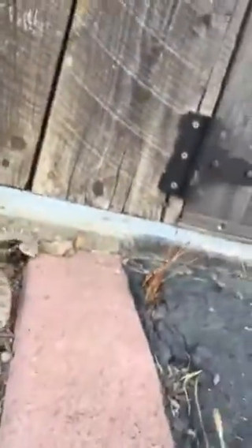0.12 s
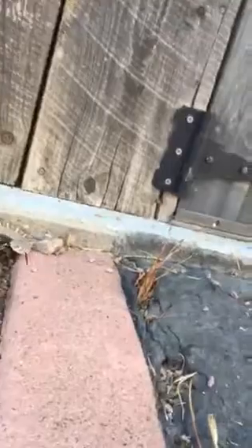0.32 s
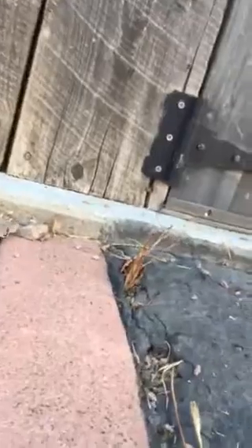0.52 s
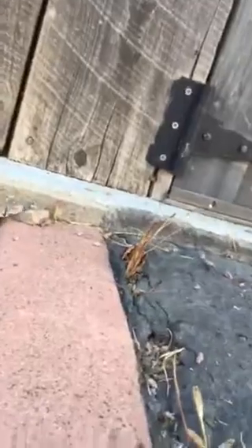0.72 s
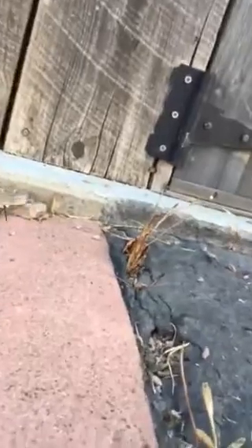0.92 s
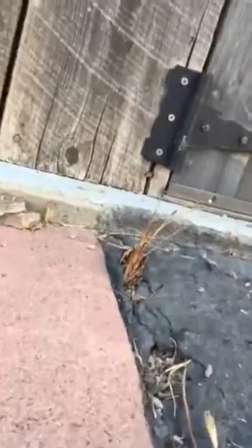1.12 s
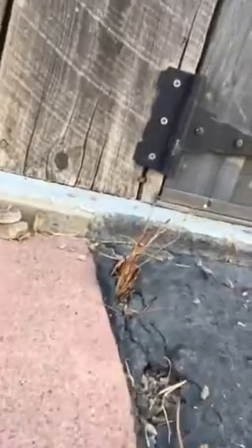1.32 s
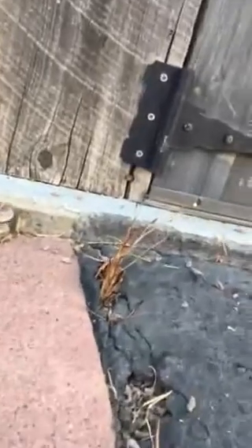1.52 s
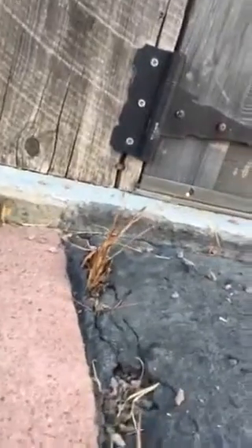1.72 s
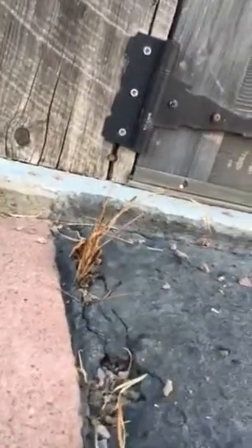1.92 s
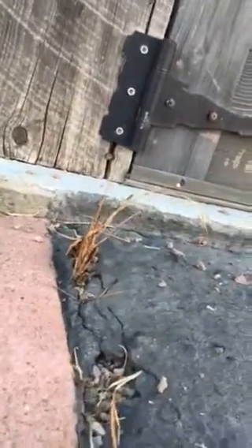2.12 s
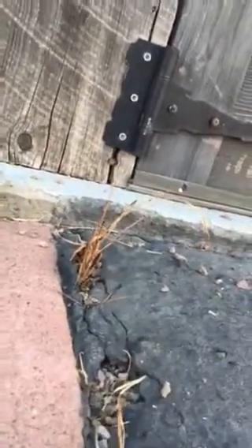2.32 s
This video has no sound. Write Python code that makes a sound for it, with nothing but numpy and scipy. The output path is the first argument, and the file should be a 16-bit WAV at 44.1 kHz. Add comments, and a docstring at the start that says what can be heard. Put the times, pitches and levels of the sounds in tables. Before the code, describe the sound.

A rattlesnake's steady, dry, high buzz outdoors, with low thumps and wind bumping the handheld microphone.

```python
"""From the start a rattlesnake buzzes beside a wooden gate: a hundred or so shakes a second, soon slowing a little,
each a quick run of noise bursts for the horny segments colliding; boards and pavement answer with decaying noise.
Scuffs (enveloped noise) come in the first half second; thumps (bursts of low noise) crowd from then to 1.2 s, with
gusts of wind (low noise) and knocks (single swings of a sine) that go on more sparsely. The colour of the buzz
shifts as the hand-held microphone moves over the pavement, and the faint hiss of the air swells near the end."""
import sys
import numpy as np
from scipy import signal
from scipy.fft import rfft, irfft, next_fast_len
from scipy.io import wavfile
from scipy.ndimage import uniform_filter1d

SR = 44100
rng = np.random.default_rng(int(sys.argv[2]) if len(sys.argv) > 2 else 0)


def dump(signal):
    """Clip the signal to [-1, 1] and save it as 16-bit WAV at the path in sys.argv[1]."""
    limited = np.clip(np.atleast_2d(signal).T, -1, 1)
    pcm = np.round(limited * 32767).astype(np.int16)
    wavfile.write(sys.argv[1], SR, pcm)


N = 103635  # length in samples

# Spectrum of the outdoor air. Each row: frequency in Hz, relative level in dB.
AIR_SPECTRUM = [(100, 4.5), (400, -3.5), (900, -3), (1600, -5.5), (2400, -8), (5000, -6.5), (15000, -10)]
# Level of the air. Each row: time in seconds, rms level in dB.
AIR_LEVEL = [(0, -63), (1.1, -63.5), (1.6, -57), (2.1, -55.5), (2.35, -60.5)]

# Strength of the wind on the microphone. Each row: time in seconds, level in dB.
WIND_LEVEL = [(0.0, -49), (0.42, -45), (0.46, -43.5), (0.52, -41.5), (0.65, -32), (0.69, -38),
              (0.77, -24.5), (0.79, -41), (0.84, -40), (0.93, -24.5), (0.97, -40.5), (1.07, -26.5),
              (1.12, -39), (1.15, -32), (1.26, -49), (1.47, -33.5), (1.54, -50), (1.58, -43), (1.65, -33.5),
              (1.69, -62), (1.82, -39.5), (1.84, -57), (1.92, -33.5), (2.0, -60.5), (2.08, -49.5),
              (2.35, -57.5)]
# Spectrum of the wind. Each row: frequency in Hz, relative level in dB.
WIND_SPECTRUM = [(15, -44), (30, -15), (50, -1.5), (70, 1.5), (100, -1.5), (150, -13.5), (250, -26.5),
                 (500, -46), (1000, -60)]
WIND_EVENNESS = 0.4  # 0 = freely fluctuating, 1 = own swells divided out

# Thumps of air and hand on the microphone. Each row: start in seconds, length in seconds,
# level in dB (rms if spread over that length), upper band edge in Hz.
THUMPS = [(.088, .025, -43.5, 173), (.198, 0.037, -45, 132), (0.454, 0.026, -38, 96),
          (.49, 0.021, -44, 160), (.565, 0.016, -30.5, 360), (.628, 0.032, -31, 284),
          (.657, 0.045, -28.5, 486), (.688, 0.016, -57, 375), (.725, 0.037, -31.5, 380),
          (.755, 0.031, -29, 234), (.794, 0.018, -33.5, 385), (.832, 0.025, -41, 355),
          (.866, 0.018, -32, 212), (.903, 0.019, -27, 430), (.918, 0.014, -28, 172),
          (.934, 0.015, -27, 466), (1.04, 0.052, -38, 276), (1.078, 0.03, -33, 430),
          (1.141, 0.021, -31, 437), (1.168, 0.027, -35.5, 210), (1.235, 0.088, -46, 222),
          (1.357, 0.015, -38.5, 195), (1.395, 0.066, -40, 268), (1.578, 0.024, -34, 164),
          (1.61, 0.019, -41.5, 206), (1.763, 0.016, -50.5, 393), (1.793, 0.018, -39, 145),
          (1.885, 0.037, -41.5, 235), (1.932, 0.0097, -39.5, 296)]
THUMP_LOW_HZ = 85.6
THUMP_SLOPE, THUMP_TILT = 4.1, 0.92  # exponents of the fall above the upper edge and of the gentler overall fall
THUMP_RISE_S, THUMP_RELEASE_S = 0.0023, 0.006

# Light scuffs of the hand. Each row: start in seconds, level in dB before the envelope.
SCUFFS = [(.051, -46), (0.235, -66), (.392, -58)]
# Spectrum of a scuff. Each row: frequency in Hz, relative level in dB.
SCUFF_SPECTRUM = [(200, -18), (500, 2.5), (750, -4), (1050, 0), (1500, -3), (2200, -19), (5000, -53)]
SCUFF_RISE_S, SCUFF_T60_S = 0.00072, 0.063

# Knocks of the fingers on the casing. Each row: centre in seconds, level in dB before the envelope, pitch in Hz.
KNOCKS = [(0.5646, -25.5, 525), (0.7139, -22.5, 526), (0.7174, -17, 194), (.9113, -23, 460),
          (0.948, -27, 352), (1.1564, -26.5, 320), (1.743, -29.5, 157), (1.925, -26, 148)]
KNOCK_WIDTH_CYCLES = 0.4  # standard deviation of the bell-shaped envelope

GATE_DB, GATE_T60_S = -14.5, 0.088  # answer of the boards and the pavement

# Speed of the tail. Each row: time in seconds, shakes per second.
SHAKE_RATE = [(0, 106.38), (.4, 104.64), (.8, 103.98), (1.15, 101.91), (1.5, 102.21), (1.85, 101.57),
              (2.35, 102.03)]
FIRST_SHAKE = 0.235  # wait before the first shake, in shakes
# Strength of the buzz. Each row: time in seconds, level in dB.
BUZZ_LEVEL = [(0, -43), (.2, -43), (.6, -43.5), (.85, -44.3), (1.3, -43), (1.7, -41.5), (2.0, -41),
              (2.15, -41.5), (2.35, -41.5)]
# Segments colliding in turn in every shake. Each row: delay as a share of a shake, relative level in dB,
# timing scatter in milliseconds.
COLLISIONS = [(0, -1.5, .25), (.16, -2.5, .4), (.24, -1.5, .35), (0.431, -1.5, .6), (0.561, -10, .6),
              (.72, -16.5, 1.0)]
CLACK_RISE_S, CLACK_T60_S, CLACK_SCATTER_DB = 0.00035, 0.0054, 3.0
SHAKE_SCATTER_DB, BACKSTROKE_DB = 1.0, -1.3  # random spread; every second swing is weaker
SEGMENT_DEPTH_DB, SEGMENT_WIDTH_HZ = 3, 972  # depth and spacing of each clack's random resonances

# Spectra of the buzz at four microphone positions. Each row: frequency in Hz, relative level in dB.
SPECTRUM_FAR = [(1160, -23), (1510, -19.5), (2020, -20.0), (2450, -31), (2800, -33), (3060, -16),
                (4520, -19.5), (5210, -9), (6070, -16), (6420, -9), (7620, -9.5), (8310, -2.5),
                (10980, -7.5), (11240, -8), (12190, -8), (12790, -9.5), (13480, -6.5), (14430, 0),
                (14770, -3.5), (15720, -9)]
SPECTRUM_PASSING = [(1160, -20.5), (1680, -16.5), (2020, -16.5), (2540, -33), (3060, -13.5), (4440, -25),
                    (5210, -10.5), (5990, -14.5), (6330, -8.5), (7190, -5.5), (7450, -8), (8310, -1.5),
                    (9600, 2), (10030, -9), (11070, -9), (13140, -9.5), (13910, -1.5), (14340, -1),
                    (14860, 0.5), (15720, -16)]
SPECTRUM_NEAR = [(1160, -27), (1590, -10.5), (2020, -16.5), (2280, -25.5), (3140, -11), (4780, -19.0),
                 (5210, -10.5), (5470, -17), (6070, -19), (7190, -7.5), (7800, -9), (8050, -3),
                 (8910, -4.5), (9170, -2.0), (9600, -0.5), (10290, -4.5), (11070, -5.0), (11670, -8.5),
                 (14080, 1), (15720, -6.5)]
SPECTRUM_TURNED = [(1160, -26), (1590, -14), (1850, -31), (2200, -28), (2710, -12.5), (3830, -14.5),
                   (4090, -9.5), (4870, -16), (5300, -3.5), (6160, -10.5), (6500, -16), (8480, 1),
                   (9260, -6.5), (9950, -7.0), (10380, -13), (11330, -9), (11580, -16.5), (12960, -10),
                   (13910, 0.5), (15720, -4)]
# Times at which those positions are reached, in order. Each entry: time in seconds.
POSITION_TIMES = [.45, 1.15, 1.98, 2.16]
RATTLE_LOW_HZ = 1180

TOP_HZ = 15810  # band limit of the recorder


def amp(db):
    """Level law: decibels to amplitude gain."""
    return 10 ** (np.asarray(db) / 20)


def unit(x):
    """Normalisation of power: scale to rms 1."""
    return x / np.sqrt(np.mean(x ** 2) + 1e-20)


def along(points, hz):
    """Logarithmic pitch: interpolate (Hz, value) points on a log frequency axis."""
    f, v = np.transpose(points)
    return np.interp(np.log(hz + 1), np.log(f + 1), v)


def curve(rows):
    """Linear interpolation: (seconds, value) points become one value per sample."""
    return np.interp(np.arange(N) / SR, *np.transpose(rows))


def decay(t, t60_s):
    """Exponential decay: a fall of 60 dB in t60_s seconds."""
    return np.exp(-np.log(1000) * t / t60_s)


def filtered(x, response):
    """Linear filtering: multiply the spectrum by a response of frequency."""
    m = next_fast_len(len(x) + 8192)
    spectrum = rfft(x, m) * response(np.fft.rfftfreq(m, 1 / SR))
    return irfft(spectrum, m)[:len(x)]


def noise(colour):
    """Spectral shaping: white noise filtered to a colour, at rms 1."""
    return unit(filtered(rng.standard_normal(N), lambda hz: amp(along(colour, hz))))


def add(track, s, sound):
    """Superposition: mix a sound into the track at time s."""
    i = int(np.clip(round(s * SR), 0, N))
    track[i:i + len(sound)] += sound[:N - i]


def air():
    """Broadband noise: the outdoor air hisses with a slowly varying level."""
    return amp(curve(AIR_LEVEL)) * noise(AIR_SPECTRUM)


def wind():
    """Turbulence: slow eddies press on the microphone as low noise, its own swells partly evened out."""
    eddies = noise(WIND_SPECTRUM)
    power = np.abs(signal.hilbert(eddies)) ** 2
    swell = np.sqrt(np.abs(uniform_filter1d(power, size=900)) + 1e-6)
    return amp(curve(WIND_LEVEL)) * unit(eddies / swell ** WIND_EVENNESS)


def thumps(size=8192):
    """Pressure bursts: short lumps of low noise, each with its own upper band edge."""
    out, t = np.zeros(N), np.arange(size) / SR
    for s, length, db, edge_hz in THUMPS:
        def band(hz):
            """Band-pass response: low cut, gentle tilt and steep upper edge."""
            tilt = (1 + hz / THUMP_LOW_HZ) ** -THUMP_TILT
            low_cut = np.hypot(1, (THUMP_LOW_HZ / (hz + 1)) ** 2)
            high_cut = np.hypot(1, (hz / edge_hz) ** THUMP_SLOPE)
            return tilt / low_cut / high_cut

        rise = np.sin(np.pi / 2 * np.clip(t / THUMP_RISE_S, 0, 1)) ** 2
        release = 1 / np.cosh(np.clip((t - length + THUMP_RELEASE_S) / THUMP_RELEASE_S, 0, 20))
        lump = rise * release * filtered(rng.standard_normal(size), band)
        add(out, s, amp(db) * lump * np.sqrt(length * SR) / np.linalg.norm(lump))
    return out


def scuffs():
    """Friction: the hand rubs briefly on the casing, as noise that starts fast and decays."""
    out, t = np.zeros(N), np.arange(SR // 10) / SR
    envelope = (1 - np.exp(-t / SCUFF_RISE_S)) * decay(t, SCUFF_T60_S)
    for s, db in SCUFFS:
        add(out, s, amp(db) * noise(SCUFF_SPECTRUM)[:len(t)] * envelope)
    return out


def knocks():
    """Overdamped impact: a dull push and pull on the casing, with no ring."""
    out, t = np.zeros(N), np.arange(N) / SR
    for s, db, hz in KNOCKS:
        cycles = (t - s) * hz
        bell = np.exp(-(cycles / KNOCK_WIDTH_CYCLES) ** 2 / 2)
        out += amp(db) * np.sin(2 * np.pi * cycles) * bell
    return out


def gate(x, count=12):
    """Diffuse reflection: boards and ground answer with decaying noise, renewed as the microphone moves."""
    t = np.arange(SR // 10) / SR
    tails = rng.standard_normal((count, len(t))) * decay(t, GATE_T60_S)
    out = np.zeros(N)
    for tail, turn in zip(tails, np.eye(count)):
        # the shares crossfade from tail to tail at constant power
        share = np.sqrt(np.interp(np.arange(N), np.linspace(0, N, count), turn))
        out += signal.fftconvolve(x * share, tail / np.linalg.norm(tail))[:N]
    return out


def clacks(count, size=512):
    """Damped resonance: short dry noise bursts of equal energy, each with its own hollow resonances."""
    t, hz = np.arange(size) / SR, np.fft.rfftfreq(size, 1 / SR)
    knots = rng.standard_normal((count, size))
    colour = np.array([np.interp(hz / SEGMENT_WIDTH_HZ, np.arange(size), k) for k in knots])
    ring = irfft(rfft(rng.standard_normal((count, size))) * amp(SEGMENT_DEPTH_DB * colour))
    ring = ring * (1 - np.exp(-t / CLACK_RISE_S)) * decay(t, CLACK_T60_S)
    return ring / np.linalg.norm(ring, axis=1, keepdims=True)


def collision_train():
    """Periodic excitation: every swing of the tail knocks the segments together in turn."""
    t = np.arange(N) / SR
    turns = np.cumsum(curve(SHAKE_RATE)) / SR - FIRST_SHAKE
    shakes = np.arange(int(turns[-1]) + 1)
    shake_db = BACKSTROKE_DB * (shakes % 2) + SHAKE_SCATTER_DB * rng.standard_normal(len(shakes))
    delay, level_db, scatter_ms = np.transpose(COLLISIONS)
    scatter_db = CLACK_SCATTER_DB * rng.standard_normal((len(shakes), len(delay)))
    sizes = amp(level_db + scatter_db)
    # the clacks share the swing's energy
    sizes = sizes / np.linalg.norm(sizes, axis=1, keepdims=True) * amp(shake_db)[:, None]
    times = np.interp(shakes[:, None] + delay, turns, t)
    times = times + scatter_ms / 1000 * rng.standard_normal(sizes.shape)
    train = np.zeros(N)
    for s, size, clack in zip(times.ravel(), sizes.ravel(), clacks(sizes.size)):
        add(train, s, size * clack)
    return train


def rattle():
    """Position-dependent transfer: the collisions are filtered for four positions and crossfaded."""
    t, train = np.arange(N) / SR, collision_train()
    spectra = [SPECTRUM_FAR, SPECTRUM_PASSING, SPECTRUM_NEAR, SPECTRUM_TURNED]
    buzz = np.zeros(N)
    for spectrum, turn in zip(spectra, np.eye(len(spectra))):
        def response(hz):
            """Transfer function: the position's colour with a low cut."""
            return amp(along(spectrum, hz)) / np.hypot(1, (RATTLE_LOW_HZ / (hz + 1)) ** 3)

        buzz += unit(filtered(train, response)) * np.interp(t, POSITION_TIMES, turn)
    return amp(curve(BUZZ_LEVEL)) * buzz


def scene():
    """Superposition: air, noises on the microphone, and the snake with its answer from the gate."""
    buzz = rattle()
    microphone = wind() + thumps() + scuffs() + knocks()
    return (air() + microphone + amp(GATE_DB) * gate(buzz) + buzz)[None]


def record(dry):
    """Band limitation: the recorder keeps nothing above its upper limit."""
    return np.array([filtered(x, lambda hz: hz < TOP_HZ) for x in dry])


dry = scene()
out = record(dry)
dump(out)
```